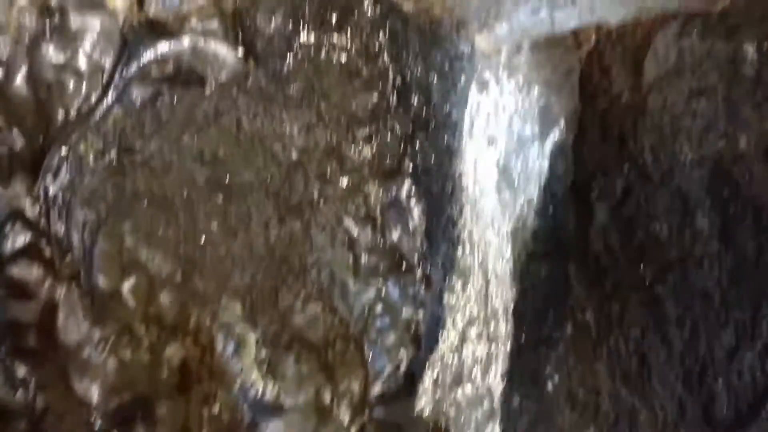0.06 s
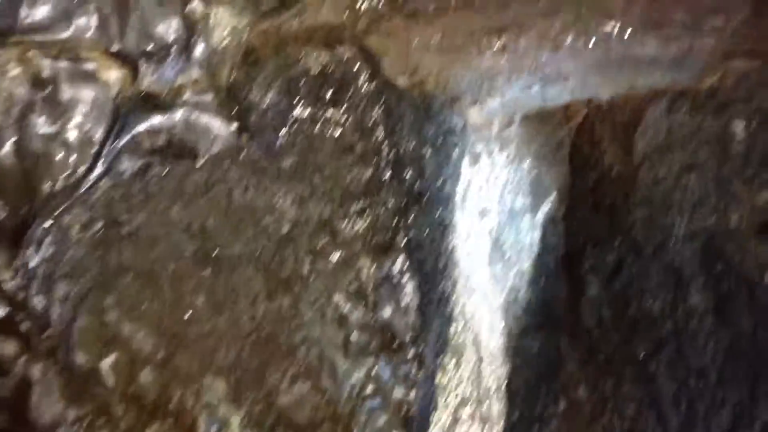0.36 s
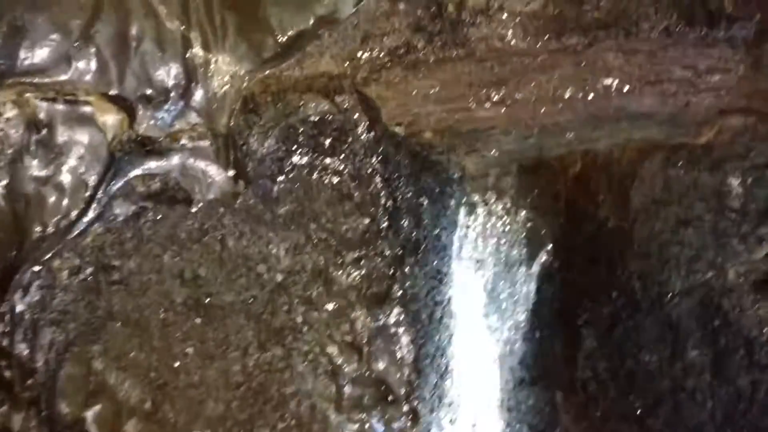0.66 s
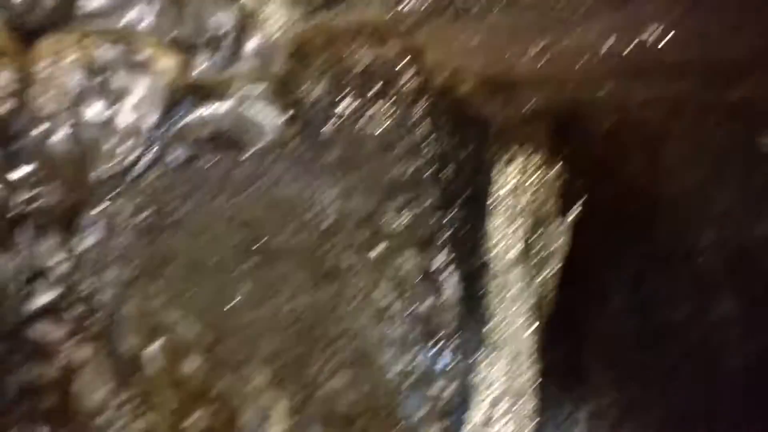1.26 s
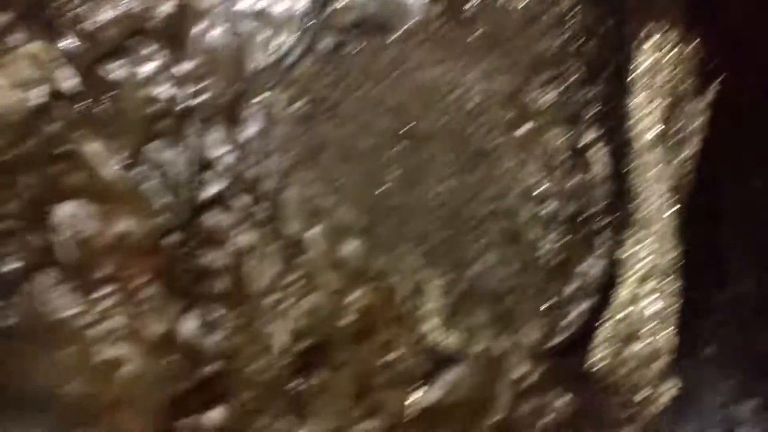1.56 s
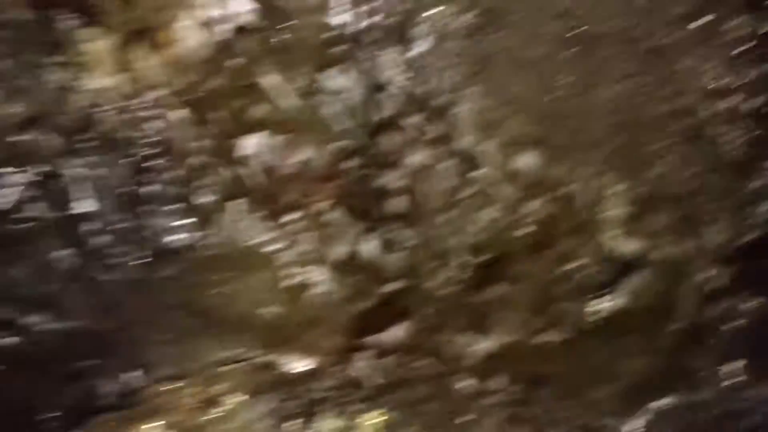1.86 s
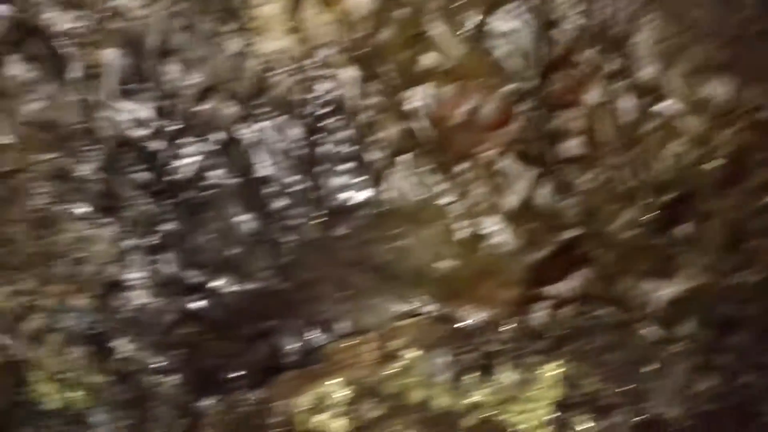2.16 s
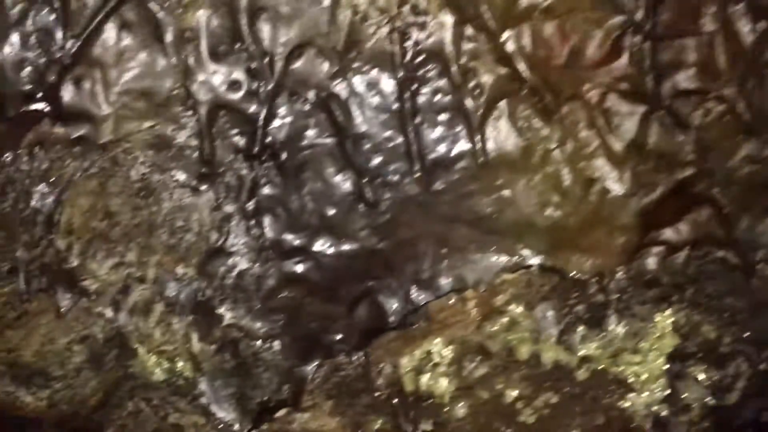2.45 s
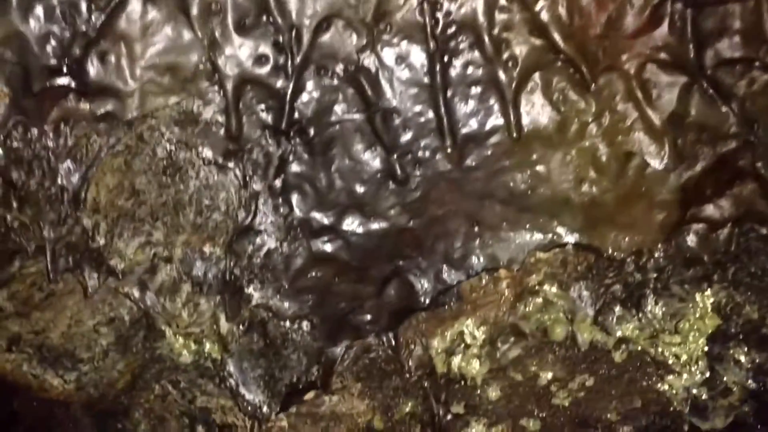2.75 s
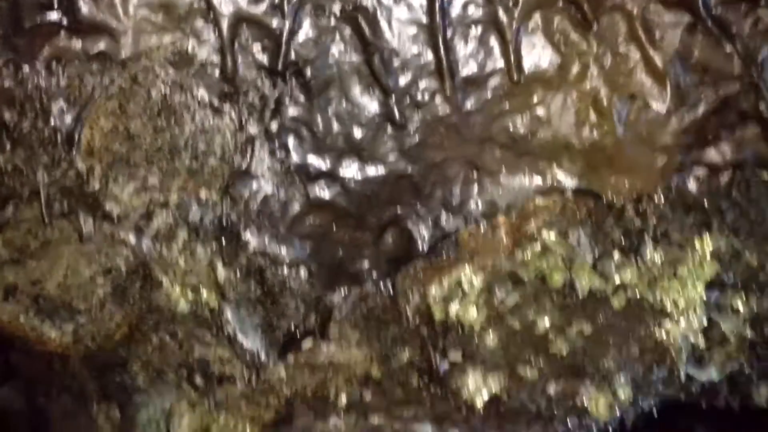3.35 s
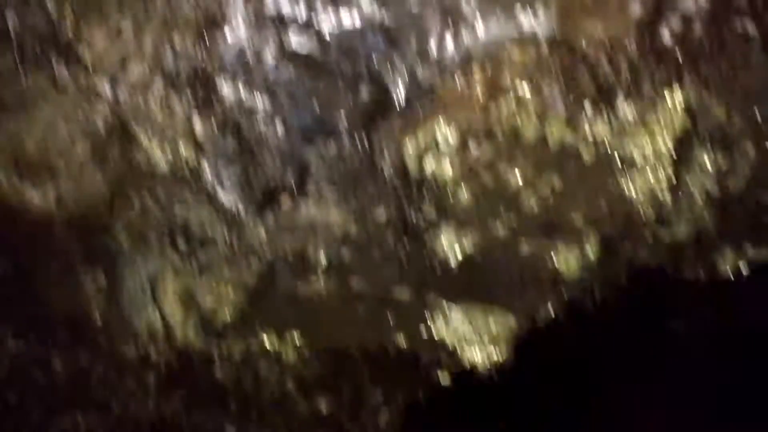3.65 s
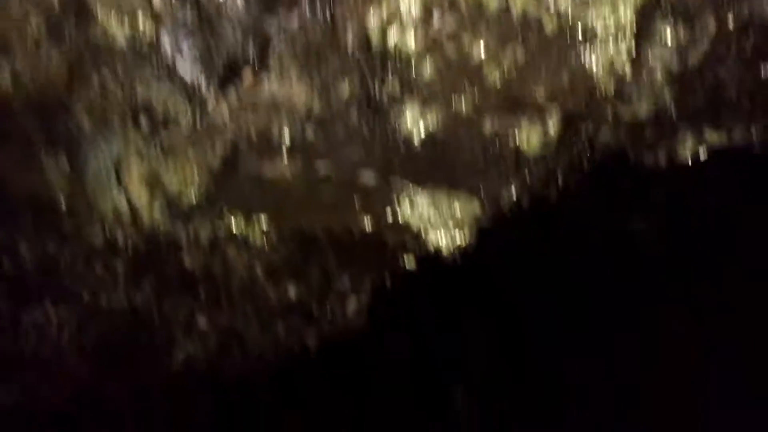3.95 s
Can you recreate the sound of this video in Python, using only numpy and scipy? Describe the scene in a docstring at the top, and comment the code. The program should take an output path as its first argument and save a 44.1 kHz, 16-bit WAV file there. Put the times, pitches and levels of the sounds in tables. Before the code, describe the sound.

Sharp clicks and duller knocks, like drops and loose stones hitting rock, come irregularly and close by in a narrow wet cave. Clothing rustles, feet shuffle and faint drips tick over a soft hiss, with a few bumps on the hand-held microphone.

```python
"""Sharp clicks and duller knocks close by, probably drops and loose stones hitting rock in a narrow wet cave.
The near walls answer within milliseconds and the passage rings briefly. Clothing rustles and feet shuffle,
while faint drips tick further off over a soft hiss. Heard from a hand-held camera that the hand bumps;
its two microphones, the left one shaded, are cross-subtracted to widen the stereo."""
import sys
import numpy as np
from scipy import signal
from scipy.fft import rfft, irfft
from scipy.io import wavfile
from scipy.ndimage import uniform_filter1d, minimum_filter1d

SR = 44100
rng = np.random.default_rng(int(sys.argv[2]) if len(sys.argv) > 2 else 0)


def generate_wav(sig):
    """Save sig (samples, or channels by samples) to the path in sys.argv[1] as 16-bit PCM at SR."""
    pcm = np.round(np.clip(np.atleast_2d(sig).T, -1, 1) * 32767).astype(np.int16)
    wavfile.write(sys.argv[1], SR, pcm)


N = 176400

# Middle, body and treble of the spectrum of a hit on rock: frequency_hz, level_db
HIT_MIDDLE = [(100, -13), (600, -17), (2000, -1), (3300, 15), (4200, 7.5), (5000, 3), (6500, 4.5),
              (9000, -16.5), (15000, -19)]
HIT_BODY = [(60, -25), (200, -1.5), (450, 0), (900, 3.5), (1400, 6), (1900, 6.5), (2400, -4), (3200, -1),
            (8000, -40)]
HIT_TREBLE = [(2000, -40), (5000, 12), (6800, 5), (8000, 8), (8800, 9.5), (10000, 3), (11200, -2),
              (12500, -13), (15000, -32)]


def undb(db):
    """Decibels to gain."""
    return 10 ** (np.asarray(db) / 20)


def along(points, size):
    """A table over log frequency, read at the bins of a signal of this size."""
    hz, value = np.array(points, float).T
    return np.interp(np.log(np.fft.rfftfreq(size, 1 / SR) + 1), np.log(hz), value)


def minimum_phase(gain):
    """Shortest causal response with this gain per bin."""
    cepstrum = irfft(np.log(gain))
    half = len(cepstrum) // 2
    cepstrum[1:half] *= 2
    cepstrum[half + 1:] = 0
    return irfft(np.exp(rfft(cepstrum)))


def unit(x):
    """Scale each channel to energy 1."""
    return x / np.sqrt(np.sum(x ** 2, axis=-1, keepdims=True))


def tint(x, points):
    """Filter by a table of frequency_hz, level_db."""
    return irfft(rfft(x) * undb(along(points, N)), N)


def noise(points, grain_db=0):
    """Coloured noise at two microphones, rms 1; grain makes it crackle."""
    grains = np.repeat(rng.standard_normal(N // 40 + 1), 40)[:N]
    white = rng.standard_normal((2, N)) * undb(grain_db * grains)
    return unit(tint(white, points)) * np.sqrt(N)


def waver(rate_hz, depth_db):
    """A gain that wanders at random around 1."""
    knots = rng.standard_normal(1000)
    return undb(depth_db * np.interp(np.arange(N) / SR * rate_hz, np.arange(len(knots)), knots))


def add(out, start_s, x):
    """Mix x in at start_s."""
    i = max(int(start_s * SR), 0)
    out[..., i:i + x.shape[-1]] += x[..., :max(N - i, 0)]


def passage(size=16384):
    """Response of the rock passage: dense early scatter, one distinct echo, a tail that dulls."""
    # Ring time of the passage: frequency_hz, t60_s
    ring_times = [(150, 0.28), (1000, 0.34), (3500, 0.27), (7000, 0.33), (14000, 0.17)]
    build_s, early_s, early_db = 0.0072, 0.013, 7
    echo_s, echo_db = 0.0111, -23.5
    t = np.arange(size) / SR
    spectrum = rfft(rng.standard_normal((2, size)))
    bands_hz, t60s = np.array(ring_times).T
    tail = 0
    for hz, t60_s in zip(bands_hz, t60s):
        band = along(np.c_[bands_hz, bands_hz == hz], size)
        tail += irfft(spectrum * band) * undb(-60 * t / t60_s)
    build_up = 1 - np.exp(-(t / build_s) ** 2)
    early_lift = 1 + undb(early_db) * np.exp(-t / early_s)
    tail = unit(tail * build_up * early_lift)
    tail[:, int(echo_s * SR)] += undb(echo_db)
    return tail


def hiss(level_db=-52):
    """A soft, slightly wavering hiss behind everything."""
    # Colour of the hiss: frequency_hz, level_db
    colour = [(30, 3), (90, 2.5), (200, 4.5), (500, 4.5), (1200, -1), (2200, -8), (3500, -3.5), (6200, 0.5),
              (9000, -1.5), (11500, -12), (15000, -19)]
    return undb(level_db) * noise(colour) * waver(rate_hz=27, depth_db=0.7)


def drips(count=36, level_db=-46, spread_db=3):
    """Drops tick faintly on rock further along the passage."""
    ticks = np.zeros((2, N))
    for when, strength in zip(rng.random(count), rng.standard_normal(count)):
        ticks[:, int(when * N)] = undb(level_db + spread_db * strength)
    ticks += signal.fftconvolve(ticks, passage(), axes=1)[:, :N]
    return tint(ticks, HIT_MIDDLE) + tint(ticks, HIT_BODY) + tint(ticks, HIT_TREBLE)


def shuffles():
    """Feet and sleeves rub in short, hollow swells."""
    # Shuffling moves: middle_s, half_length_s, level_db, centre_hz
    moves = [(0.16, 0.026, -43.5, 161), (1.755, 0.04, -51, 860), (1.98, 0.018, -42.5, 146),
             (2.023, 0.018, -36, 390), (2.311, 0.013, -48.5, 850), (2.952, 0.021, -45.5, 150),
             (3.32, 0.035, -51.5, 129), (3.698, 0.015, -40, 360), (3.955, 0.0031, -48.5, 1380)]
    t, out = np.arange(N) / SR, 0
    hz = np.geomspace(20, 20000, 40)
    for middle_s, half_length_s, level_db, centre_hz in moves:
        hump_db = -20 * np.log10(1 + np.log2(hz / centre_hz) ** 2)
        rolloff_db = -10 * np.log10(1 + (hz / centre_hz / 2) ** 2)
        swell = np.exp(-((t - middle_s) / half_length_s) ** 2 / 2)
        out += undb(level_db) * swell * noise(np.c_[hz, hump_db + rolloff_db])
    return out


def rustles():
    """Clothing rubs near the microphones, a grainy swish above a lower scrape; the passage answers."""
    # Strokes of cloth: start_s, hold_s, level_db, extra_scrape_db
    strokes = [(0, 0.075, -47.5, -8.5), (0.1, 0.041, -41.5, 1), (0.183, 0.063, -47, 2.5),
               (0.286, 0.14, -44.5, -3), (0.433, 0.076, -47, -1.5), (0.52, 0.09, -52.5, 4),
               (0.627, 0.089, -50.5, 1), (0.782, 0.2, -51.5, -3), (1.16, 0.02, -51, -2.5),
               (1.681, 0.035, -42, -6), (1.792, 0.024, -52, 2.5), (1.822, 0.16, -54.5, 0),
               (2.151, 0.025, -54, 5), (2.68, 0.14, -51.5, 2), (2.974, 0.41, -49.5, -2),
               (3.201, 0.059, -44, -3.5), (3.372, 0.25, -49.5, 1), (3.695, 0.12, -55.5, 2)]
    # Colours of the swish and the scrape: frequency_hz, level_db
    swish_colour = [(500, 7), (2200, -24.5), (3500, -2.5), (4400, -1), (6200, 0.5), (7500, -0.5),
                    (9500, -8), (11500, -15.5), (15000, -27)]
    scrape_colour = [(40, -25), (120, -4.5), (400, -3), (800, -1.5), (1250, 1.5), (1900, -2.5),
                     (3000, -5.5), (8000, -38)]
    attack_s, release_s = 0.03, 0.049
    scrape_db, passage_db = -6, -4
    t = np.arange(N) / SR
    swish_power = scrape_power = 0
    for start_s, hold_s, level_db, extra_scrape_db in strokes:
        attack = np.clip((t - start_s) / attack_s, 0, 1)
        release = np.exp(-np.maximum(t - start_s - hold_s, 0) / release_s)
        push = undb(level_db) * attack * release
        swish_power += push ** 2
        scrape_power += (push * undb(scrape_db + extra_scrape_db)) ** 2
    swish = np.sqrt(swish_power) * noise(swish_colour, grain_db=3)
    scrape = np.sqrt(scrape_power) * noise(scrape_colour, grain_db=3)
    rub = (swish + scrape) * waver(rate_hz=45, depth_db=1.5)
    return rub + undb(passage_db) * signal.fftconvolve(rub, passage(), axes=1)[:, :N]


def hand_bumps(size=2048):
    """Heavily damped thuds of the camera body with a brief rub of skin, felt by the right microphone."""
    # Bumps of the hand: start_s, level_db
    bumps = [(0.0257, -25.5), (0.086, -39), (0.253, -22), (0.2706, -31), (0.299, -36), (0.344, -42),
             (0.4464, -24), (1.1901, -28), (1.29, -39), (2.001, -29.5)]
    thud_hz, rise_s, lead_s = 176, 0.0017, 0.0006
    rub_db, rub_decay_s = -23, 0.0068
    out, t = np.zeros((2, N)), np.arange(size) / SR
    thud = (t / rise_s) ** 2 * np.exp(-t / rise_s) * np.sin(2 * np.pi * thud_hz * (t + lead_s))
    thud /= np.abs(thud).max()
    for start_s, level_db in bumps:
        rub = signal.lfilter([0.5], [1, -0.7], rng.standard_normal(size)) * np.exp(-t / rub_decay_s)
        add(out[1], start_s, undb(level_db) * (thud + undb(rub_db) * rub))
    return out


def stone_ring(t, detune=0.007):
    """The struck stone rings in high modes, tuned a little differently at every hit."""
    # Modes of the stone: pitch_hz, level_db, t60_s
    modes = [(3060, -39, 0.025), (3567, -17, 0.054), (4070, -4.5, 0.056), (5850, -7, 0.028),
             (6800, 6, 0.025), (7600, -2, 0.034), (8600, -13, .025)]
    ring = 0
    for pitch_hz, level_db, t60_s in modes:
        hz = pitch_hz * (1 + detune * rng.standard_normal())
        ring += undb(level_db - 60 * t / t60_s) * np.sin(2 * np.pi * hz * t)
    return unit(ring)


def knock(t, pitch_hz):
    """The struck spot knocks in two quickly damped modes."""
    # Modes of the spot: pitch_ratio, level_db, t60_s
    modes = [(0.998, 1, 0.023), (1.52, 4, 0.0078)]
    tone = sum(undb(level_db - 60 * t / t60_s) * np.cos(2 * np.pi * pitch_hz * ratio * t)
               for ratio, level_db, t60_s in modes)
    band = signal.butter(1, [pitch_hz / 2, min(pitch_hz * 2, SR / 2 - 1)], 'band', fs=SR, output='sos')
    return unit(signal.sosfilt(band, tone))


def paths_to_microphones(t, walls_db, passage_db):
    """A hit arrives directly with a splash of grit, then from the near walls and the passage."""
    walls_s, spread_s, echo_s, echo_db = 0.0036, 0.00094, 0.0026, -19
    grit_s, grit_db = 0.0006, 3
    left_late_s = 0.00017  # the struck rock lies to the right
    size = len(t)
    paths = undb(passage_db) * passage()
    walls = unit(rng.standard_normal((2, size)) * np.exp(-((t - walls_s) / spread_s) ** 2 / 2))
    walls[:, int(echo_s * SR)] += undb(echo_db)
    grit = unit(rng.standard_normal((2, size)) * t * np.exp(-2 * t / grit_s))
    paths[:, :size] += undb(walls_db) * walls + undb(grit_db) * grit
    paths[1, 0] += 1
    paths[0, int(left_late_s * SR)] += 1
    return paths


def rock_clicks(size=4096):
    """Each close hit on rock cracks, knocks and sets the stone ringing."""
    # Hits: start_s, level_db, body_db, treble_db, ring_db, walls_db, passage_db, knock_hz, knock_db
    hits = [(0.0338, -16, -29, 1, -24, -13, -8.5, 5850, -12),
            (0.367, -33, 12, -12, -14, -10, -1, 1354, 9.5),
            (0.9657, -5.5, -2, 4.5, -34, -3, -7.5, 1760, -9.5),
            (1.056, -38.5, 20.5, -12, -26, -17, -10, 1380, 6), (1.455, -37, -13, 3, -20, -4, 2, 6500, 8.5),
            (1.646, -39, 6, 8, -20, 5.5, 3, 6190, 10.5), (1.935, -45, -12, 12.5, -26, 8.5, 2, 8800, -14),
            (1.955, -28.5, -26, -8, 1, -3, 0.5, 6190, 4.5), (1.9991, -13, 1, -4.5, -16, 4.5, 7.5, 910, -4),
            (2.0254, -10, 7, -6.5, -11, 3, -2.5, 495, -5), (2.129, -37.5, -6, 13, -20, 5, 2, 6700, 2),
            (2.5048, -19.5, 8, -7.5, -15, 9.5, 8, 744, -5.5),
            (2.6217, -17, 8.5, -7, -14, 6.5, 8.5, 1040, -15),
            (2.6332, -24.5, 14, -16, -17, 3.5, -2, 1340, 8), (2.720, -26, 4, 2.5, -1, 2.5, 5, 3700, -10),
            (2.8972, -18, -3, 4, -18, 7.5, 7, 1610, -4.5), (2.9005, -22.5, 11, 3, -14, -10, 5.5, 5660, 8),
            (3.049, -30, -1, 7.5, -24, 5, 4, 6200, -8), (3.560, -21, 9.5, -5, -11, -1, 4, 1340, -16),
            (3.5781, -9, -5, 7, -12, -4.5, 4.5, 945, -11.5), (3.5842, -15, 1, 11, -14, -7, 0, 6100, -13),
            (3.6033, -14, -20, 6, 7, 2, -3, 5940, 0), (3.6118, -16, -2, 10.5, -16, -5, -8, 3440, -10),
            (3.8241, 1, -2.5, 4.5, 5.5, -1, -3, 1134, -14)]
    out, t = np.zeros((2, N)), np.arange(size) / SR
    middle, body, treble = (undb(along(part, size)) for part in (HIT_MIDDLE, HIT_BODY, HIT_TREBLE))
    for start_s, level_db, body_db, treble_db, ring_db, walls_db, passage_db, knock_hz, knock_db in hits:
        power = middle ** 2 + (body * undb(body_db)) ** 2 + (treble * undb(treble_db)) ** 2
        crack = minimum_phase(np.sqrt(power))
        hit = crack + undb(ring_db) * stone_ring(t) + undb(knock_db) * knock(t, knock_hz)
        paths = paths_to_microphones(t, walls_db, passage_db)
        add(out, start_s, undb(level_db) * signal.fftconvolve(paths, hit[None], axes=1))
    return out


def scene():
    """The cave at the two microphones, the left one shaded, plus handling noise."""
    # Response of the shaded left microphone: frequency_hz, gain_db
    shade = [(100, -8), (600, -7.5), (3000, 2), (4500, -9), (6500, -4), (8000, -9.5), (10000, -4.5),
             (13000, 3)]
    left, right = rustles() + rock_clicks() + drips() + shuffles() + hiss()
    return np.array([tint(left, shade), right]) + hand_bumps()


def record(dry):
    """The camera subtracts from each channel a late copy of the other, limits peaks and cuts both ends."""
    # Response of the subtracted copy: frequency_hz, gain_db
    cross_response = [(100, -.3), (1500, -.1), (2500, 0), (5000, -.5), (7500, -2.5), (10000, -.3),
                      (15000, -1.5)]
    # Left channel against the right: frequency_hz, level_db
    balance = [(60, -2), (300, -2), (600, -2.5), (1400, 1), (2800, -0.5), (5500, -2.5), (9000, -1.5),
               (13000, 0.5)]
    cross_s, low_cut_hz, high_cut_hz, limiter_samples = 0.000397, 47, 15400, 130
    delay = np.exp(-2j * np.pi * np.fft.rfftfreq(N, 1 / SR) * cross_s)
    wide = dry - irfft(rfft(dry[::-1]) * delay * undb(along(cross_response, N)), N)
    wide = signal.sosfilt(signal.butter(2, low_cut_hz, 'high', fs=SR, output='sos'), wide)
    lean = undb(along(balance, N) / 2)
    wide = irfft(rfft(wide) * np.array([lean, 1 / lean]), N)
    headroom = 1 / np.maximum(np.abs(wide).max(axis=0), 1)
    limiter_gain = uniform_filter1d(minimum_filter1d(headroom, limiter_samples), limiter_samples)
    high_cut = signal.ellip(8, 0.2, 70, high_cut_hz, fs=SR, output='sos')
    return signal.sosfilt(high_cut, wide * limiter_gain)


dry = scene()
out = record(dry)
generate_wav(out)
```